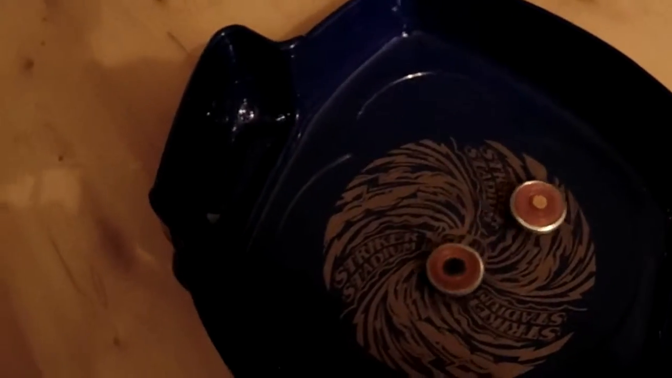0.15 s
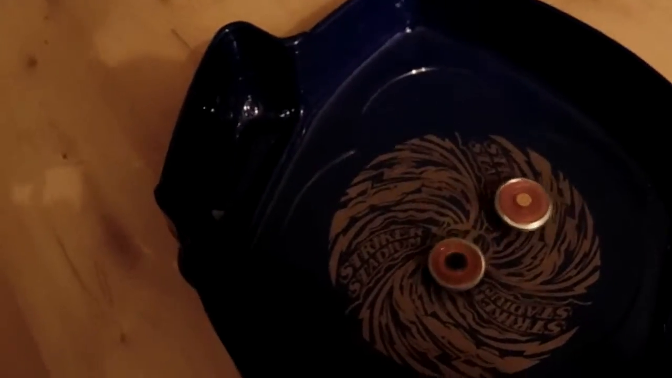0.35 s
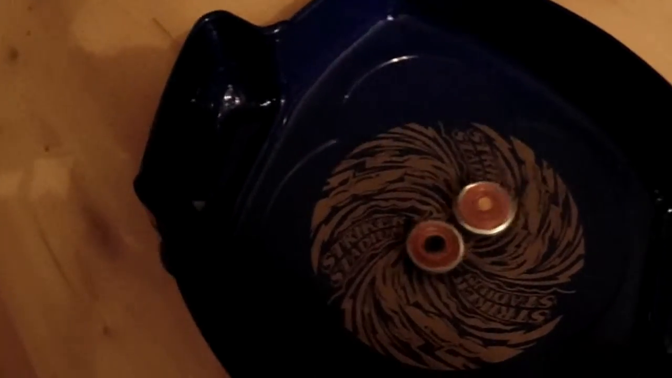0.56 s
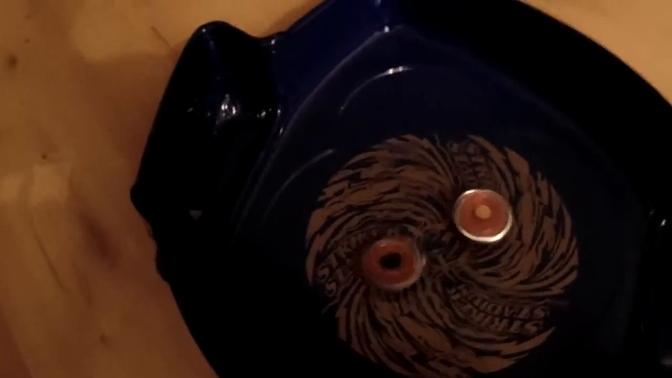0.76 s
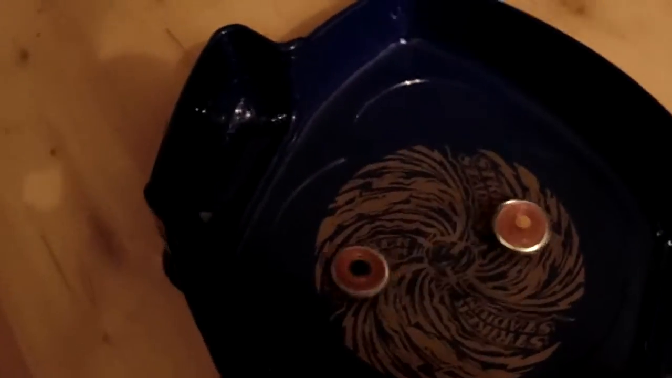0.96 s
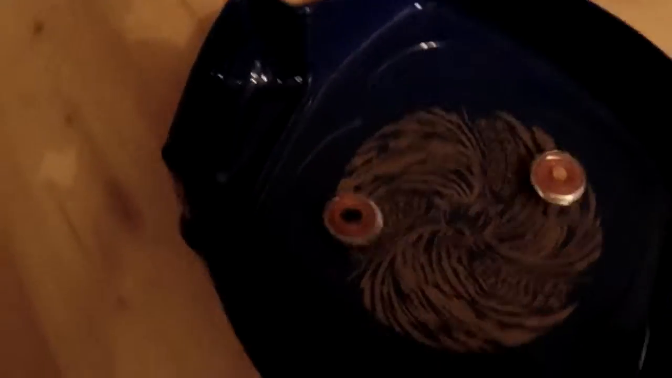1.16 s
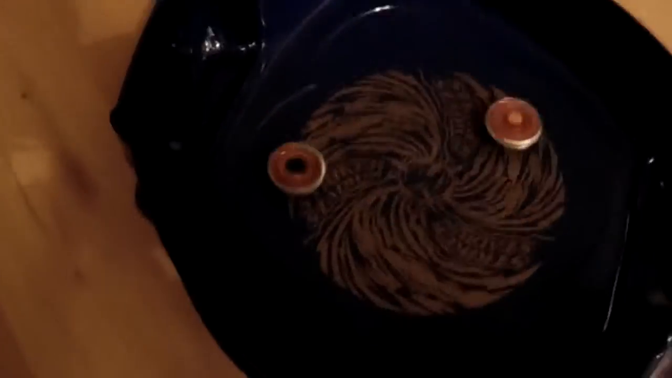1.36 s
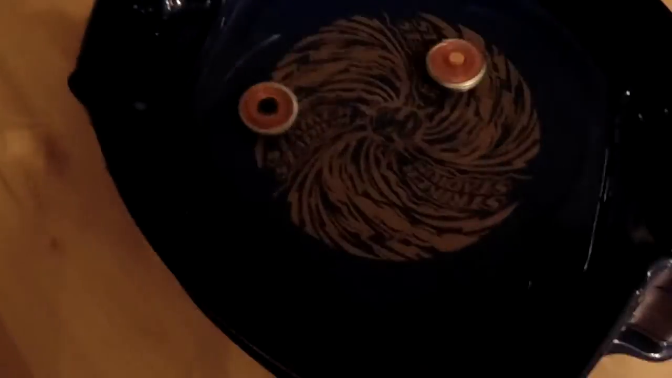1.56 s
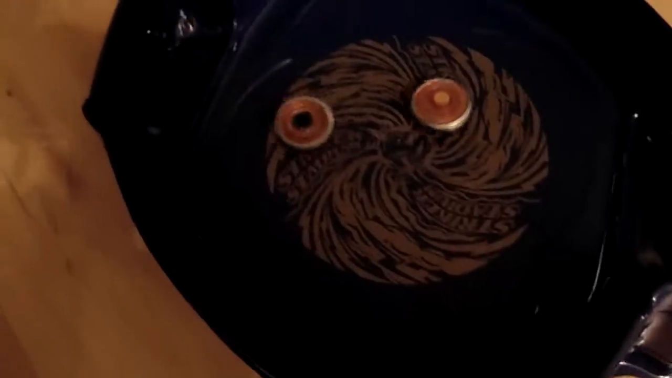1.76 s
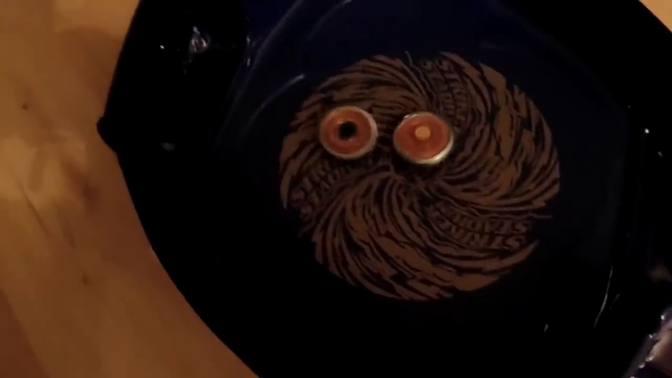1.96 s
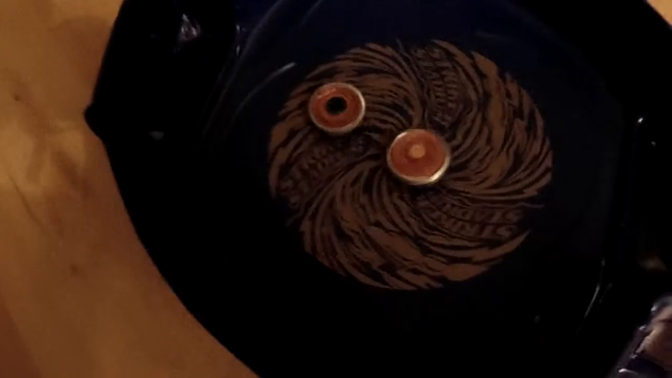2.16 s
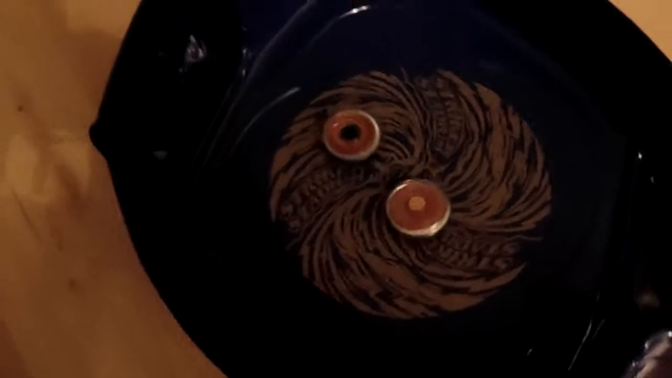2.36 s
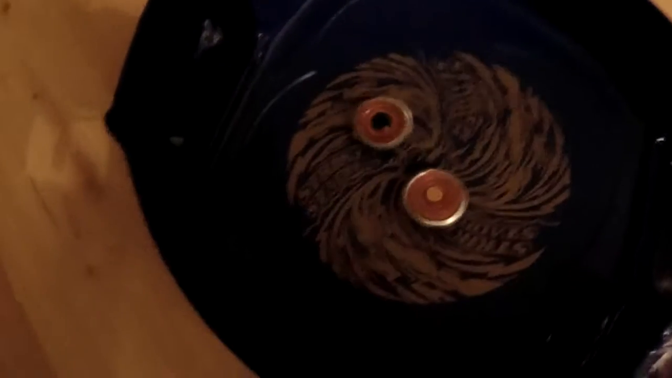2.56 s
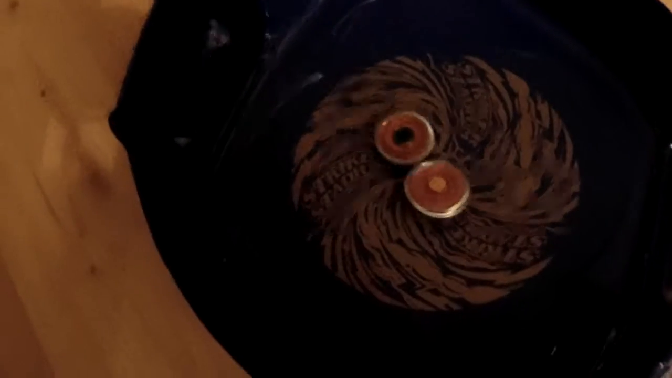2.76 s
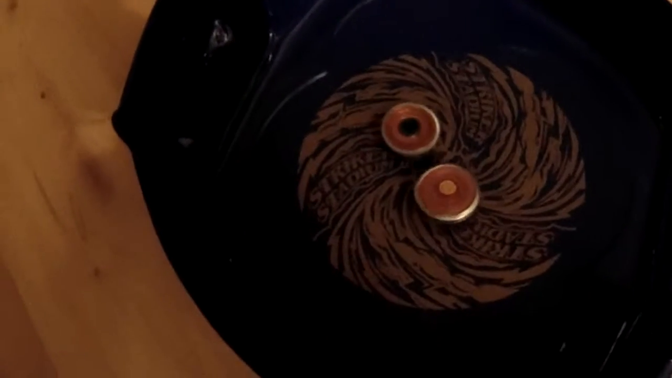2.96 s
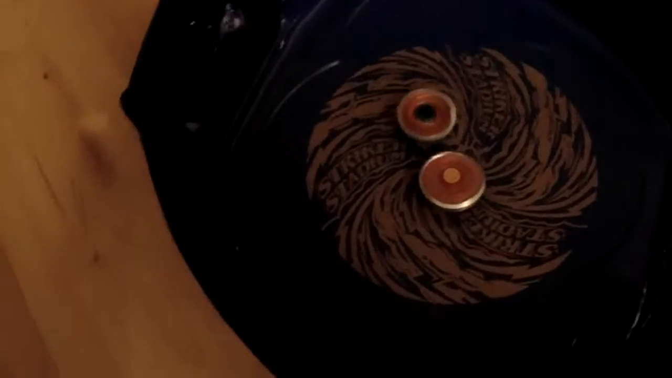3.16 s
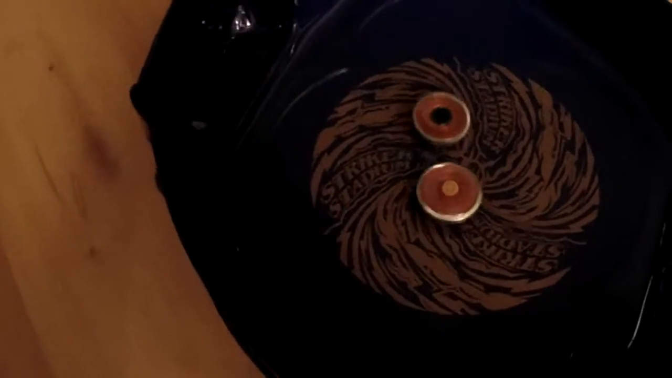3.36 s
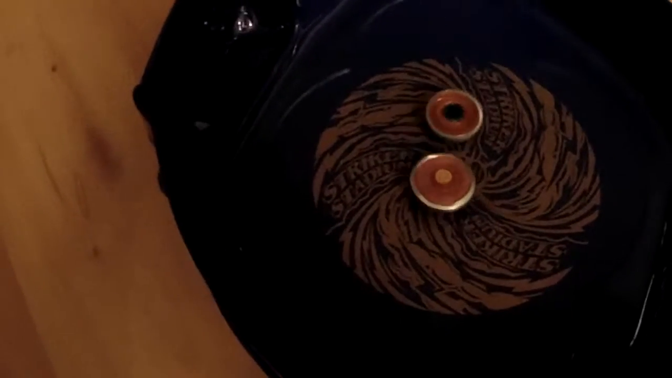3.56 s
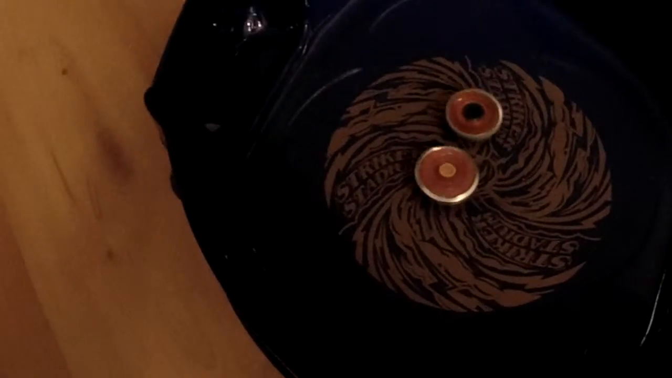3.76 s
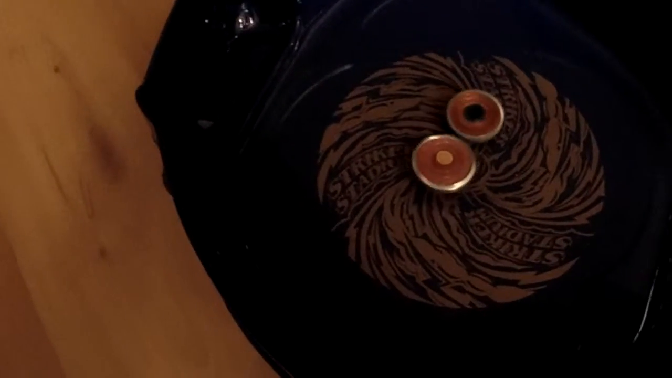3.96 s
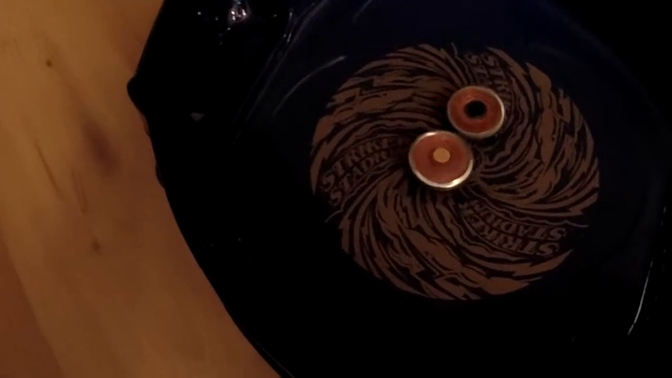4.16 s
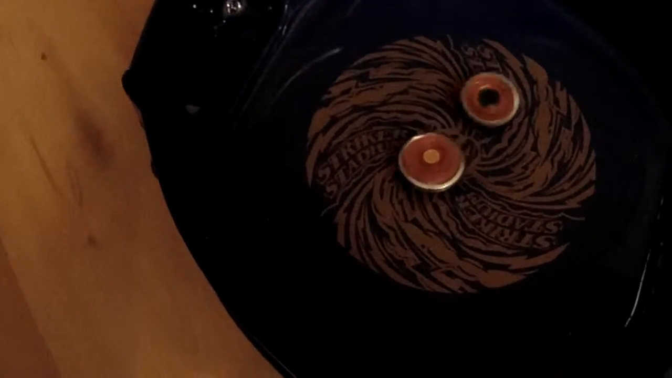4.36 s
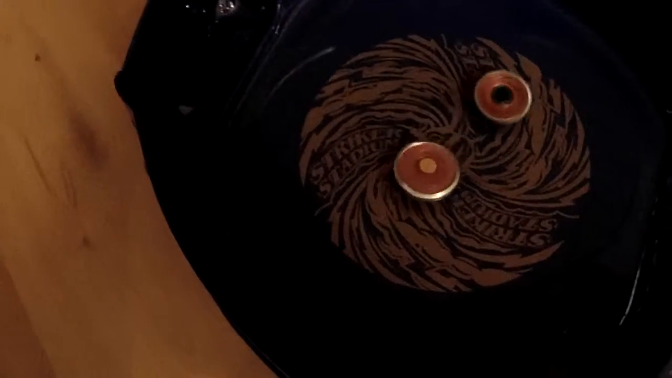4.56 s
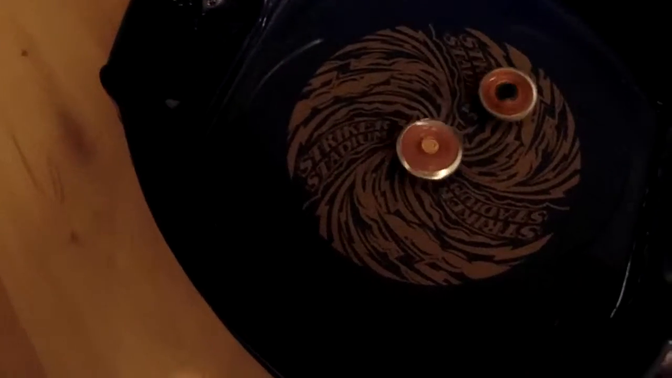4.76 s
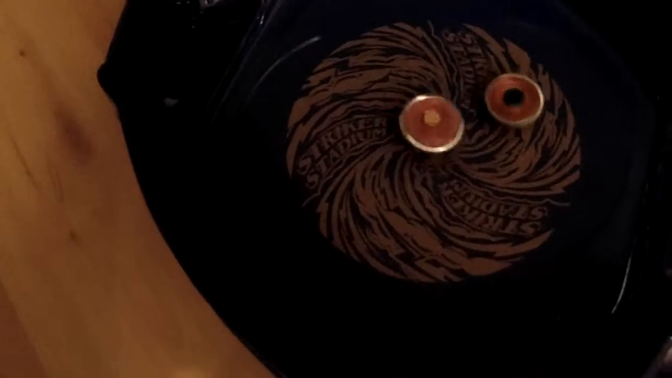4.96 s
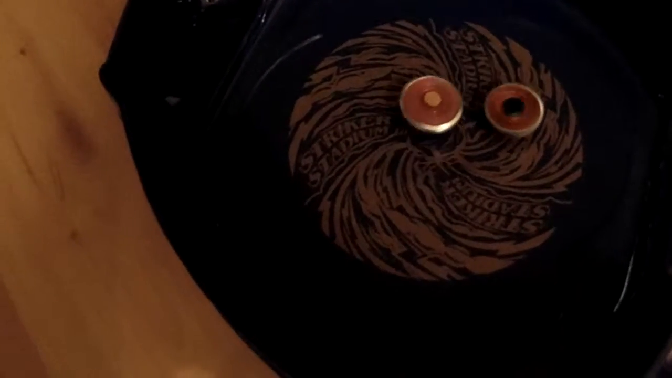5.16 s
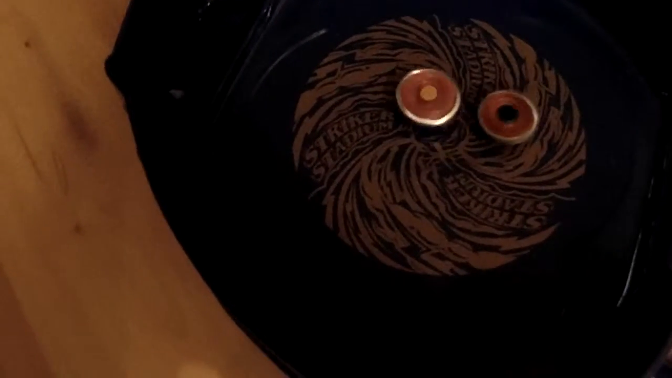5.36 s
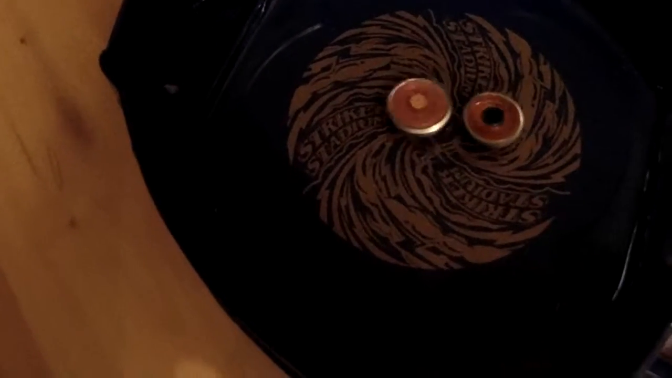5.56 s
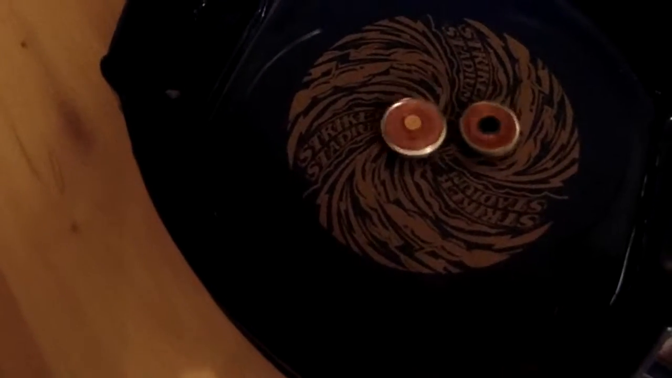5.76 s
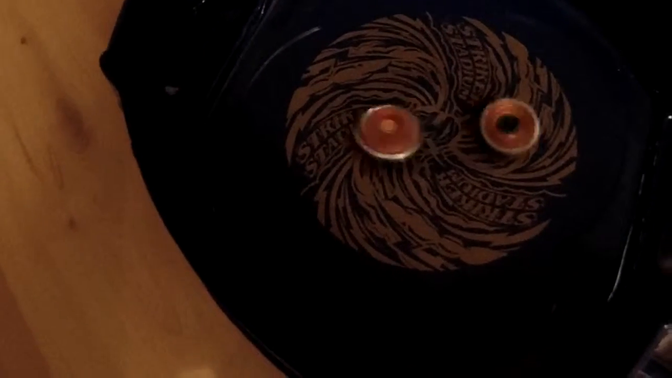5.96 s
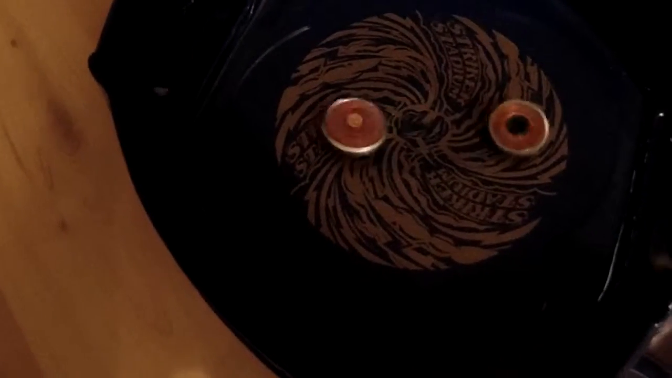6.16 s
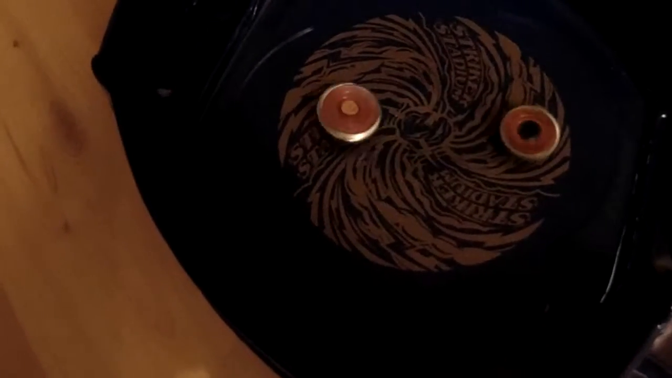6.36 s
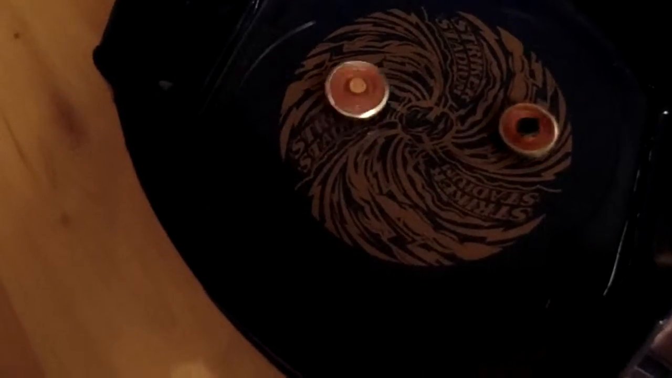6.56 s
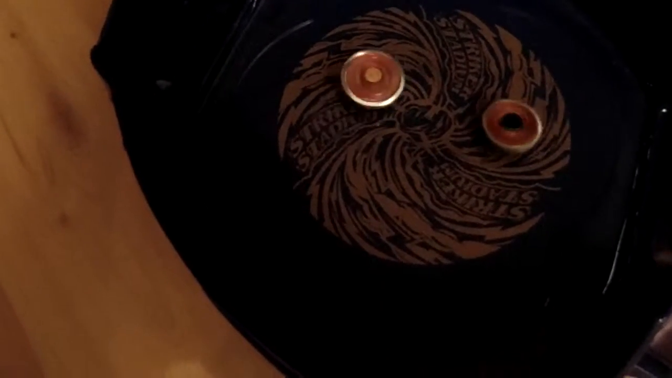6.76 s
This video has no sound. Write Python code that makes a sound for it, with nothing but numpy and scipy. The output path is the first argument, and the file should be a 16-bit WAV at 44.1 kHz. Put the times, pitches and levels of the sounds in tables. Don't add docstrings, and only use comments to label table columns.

```python
import sys
import numpy as np
from scipy import signal
from scipy.fft import rfft, irfft
from scipy.io import wavfile
from scipy.ndimage import uniform_filter1d

SR = 44100
rng = np.random.default_rng(int(sys.argv[2]) if len(sys.argv) > 2 else 0)


def amplitude_ratio(level_db):
    exponent = np.asarray(level_db, float) / 20
    return 10 ** exponent


def dump(signal):
    limited = np.clip(np.atleast_2d(signal).T, -1, 1)
    pcm = np.round(limited * 32767).astype(np.int16)
    wavfile.write(sys.argv[1], SR, pcm)


N = 300762


def evened(x):
    return x / np.sqrt(np.mean(x ** 2) + 1e-20)


def read(points, hz):
    f, value = np.transpose(points)
    return np.interp(np.log(hz + 1), np.log(f + 1), value)


def coloured(x, tone):
    gain = amplitude_ratio(read(tone, np.fft.rfftfreq(len(x), 1 / SR)))
    return irfft(rfft(x) * gain, len(x))


def along(table, column):
    rows = np.array(table)
    return np.interp(np.arange(N) / SR, rows[:, 0], rows[:, column])


def add(mix, start_s, sound):
    part = mix[round(start_s * SR):][:len(sound)]
    part += sound[:len(part)]


def high_pass(x, hz):
    return signal.sosfilt(signal.butter(2, hz, "high", fs=SR, output="sos"), x)


def grains(per_s, spread_db):
    strength = amplitude_ratio(spread_db * np.minimum(rng.exponential(1, N), 5))
    return strength * (rng.random(N) < per_s / SR) * rng.standard_normal(N)


def modes(table, t, detune):
    luck = rng.random((len(table), 2))
    out = 0
    for (hz, db, t60_s), (pitch, phase) in zip(table, luck):
        turns = hz * (1 + detune * (pitch - .5)) * t + phase
        out = out + amplitude_ratio(db - 60 * t / t60_s) * np.sin(2 * np.pi * turns)
    return out


# time in seconds, level in dB.
GRINDING_DB = [(0, -60.5), (.4, -55), (.7, -68), (.95, -51.5), (1.31, -54.5), (1.48, -57.5), (1.82, -55),
               (2.03, -51), (2.26, -68), (2.51, -96), (2.77, -54), (2.96, -67), (4.1, -73), (4.77, -58),
               (5.8, -70), (6.12, -58), (6.4, -61.5), (6.82, -62)]
# frequency in Hz, level in dB.
GRIND_TONE = [(60, -22.5), (150, 0.5), (280, 3), (450, -2), (650, 1), (900, -9.5), (1500, -20.5),
              (3000, -27.5), (6000, -42.5)]


def grind():
    contacts = coloured(grains(900, 3.0), GRIND_TONE)
    lumps = amplitude_ratio(0.71 * evened(uniform_filter1d(rng.standard_normal(N), 900)))
    return amplitude_ratio(along(GRINDING_DB, 1) - 6.0) * evened(contacts * lumps)


# start in seconds, level in dB, pitch in Hz.
HOPS = [
    (0.567, -55.5, 770),
    (0.636, -48.5, 736),
    (0.699, -52, 680),
    (0.733, -51, 725),
    (4.962, -55, 640),
    (4.997, -53, 590),
]


def hop(start_s, db, hz):
    t = np.arange(2000) / SR
    rise = 1 - np.exp(-t / 0.00041)
    return start_s, amplitude_ratio(db + 6.5) * modes([(hz, 0, .04)], t, 0.024) * rise


NODE_SHARE = .03


def struck(lobes, drive, contact_deg):
    out = []
    for (body, count), (angle_deg, db) in zip(lobes, drive):
        lobe = np.cos(np.radians(count * contact_deg[int(body)] - angle_deg) / 2) ** 2
        out.append(db + 20 * np.log10(NODE_SHARE + lobe))
    return out


def click(tone):
    cepstrum = irfft(np.log(amplitude_ratio(read(tone, np.fft.rfftfreq(1024, 1 / SR)))))
    cepstrum[1:512] *= 2
    cepstrum[513:] = 0
    pulse = irfft(np.exp(rfft(cepstrum)))
    return pulse / abs(pulse).max()


THROB_HZ = 29.2
# pitch in Hz, decay t60 in seconds, split of each close pair in Hz.
RING_HZ = [3370, 3922, 4148, 4398, 4865, 8060, 8292, 8553, 8845, 9450, 11030]
RING_T60_S = [.24, .14, .28, .25, .09, .14, .24, .18, .12, .09, .11]
RING_SPLIT_HZ = [5, 15, 14, 5, 15, 20, 8, 8, 25, 50, 55]
RING_LOBES = [(1, 3), (0, 5), (1, 4), (0, 4), (2, 3), (0, 5), (2, 1), (0, 4), (1, 3), (0, 4), (2, 5)]
# angle of the lobe pattern in degrees, level in dB when struck on a lobe.
RING_DRIVE = [(72, -25.5), (247, -29.5), (35.3, -22.5), (108, -19), (36, -32), (234, -32.5), (144, -33.5),
              (117.8, -35), (63, -21), (36, -20), (324, -22)]


def rings(contact_deg, t):
    ring_db = struck(RING_LOBES, RING_DRIVE, contact_deg)
    out = 0
    for hz, t60_s, split_hz, db in zip(RING_HZ, RING_T60_S, RING_SPLIT_HZ, ring_db):
        shift, phase = rng.random(2)
        lower_hz = hz - .5 * shift * split_hz
        upper_hz = hz + (1 - .5 * shift) * split_hz
        pair = [(lower_hz, db, t60_s), (upper_hz, db - 17.5, t60_s)]
        throb = 1 + .55 * np.cos(2 * np.pi * (THROB_HZ * t + phase))
        out = out + throb * modes(pair, t, 0)
    return out * (1 - np.exp(-t / 0.0015))


PART_HZ = [
    [3050, 3350],
    [3880, 4350, 4900],
    [5480, 5765],
    [8050, 8750, 9400, 10000],
    [1950, 2240, 2700],
    [10550, 11030],
    [12300, 12720, 13600],
]
# level in dB, decay t60 in seconds.
PARTS = [
    [(-4.5, 0.022), (-3.5, 0.03)],
    [(-3, 0.011), (1, .01), (-2, 0.007)],
    [(-2, 0.011), (-0.5, 0.022)],
    [(-6.5, 0.0089), (-4.5, 0.0053), (5, 0.0069), (-4, .008)],
    [(-12.5, 0.021), (-5, 0.029), (4, 0.013)],
    [(-10, .008), (-3.5, 0.017)],
    [(4.5, 0.0045), (6, 0.01), (-6.5, .008)],
]
PART_LOBES = [(2, 4), (2, 5), (1, 4), (1, 5), (0, 5), (2, 5), (0, 5)]
# angle of the lobe pattern in degrees, level in dB when struck on a lobe.
PART_DRIVE = [(161.9, -14.5), (153, -12.5), (0, -11), (319, -11.5), (81, -24), (261, -5.5), (80, -13)]


def damped_parts(contact_deg, t):
    table = []
    for pitches, group, drive_db in zip(PART_HZ, PARTS, struck(PART_LOBES, PART_DRIVE, contact_deg)):
        for hz, (db, t60_s) in zip(pitches, group):
            table.append((hz, db + drive_db, t60_s))
    table.sort()
    luck = rng.random((len(table), 2)) - .5
    out = np.zeros((2, len(t)))
    for k, ((hz, db, t60_s), (pitch, level)) in enumerate(zip(table, luck)):
        decay = amplitude_ratio(db + 1.3 * level - 60 * t / t60_s)
        out[k % 2] += (-1) ** k * decay * np.sin(2 * np.pi * hz * (1 + 0.0034 * pitch) * t)
    return out * (1 - np.exp(-(t / 0.00031) ** 2))


# frequency in Hz, decay t60 in seconds.
ROOM_T60 = [(300, 0.65), (1000, 0.35), (3000, 0.31), (6000, 0.32), (10000, 0.29), (14000, 0.25)]
# delay in seconds, level in dB.
ECHO_S = [.0053, .0072, .0126, .0165, .0190]
ECHO_DB = [-9.5, -19.5, -8.5, -15.5, -16.5]


def room(sources, tail_db=-5.5):
    slots = np.arange(300, SR // 2 - 16, 16)
    taps = np.zeros((len(sources), SR // 2))
    places = slots + rng.integers(0, 16, (len(sources), len(slots)))
    np.put_along_axis(taps, places, rng.choice([-1., 1.], places.shape), 1)
    hz, t, z = signal.stft(taps, SR, nperseg=256)
    decay = amplitude_ratio(-60 * t / read(ROOM_T60, hz)[:, None])
    tails = signal.istft(z * decay, SR, nperseg=256)[1]
    tails *= amplitude_ratio(tail_db) / np.linalg.norm(tails[0])
    tails[:, 0] += 1
    for delay_s, db in zip(ECHO_S, ECHO_DB):
        for tail in tails:
            tail[round((delay_s + .0005 * rng.random()) * SR)] += amplitude_ratio(db)
    return signal.fftconvolve(sources, tails, axes=1).sum(0)


# start in seconds, blow in dB, contact in degrees on first rim, second rim and loose weight ring.
CLASHES = [
    (0.662, -5.5, 64, 150, 307),
    (0.766, -1.5, 239, 76.2, 45.3),
    (2.0852, 2.5, 334.3, 333.4, 339),
    (2.834, -2, 153, 72.3, 148.4),
    (3.1636, -11.5, 241, 81.3, 225),
    (4.0098, -14, 99, 147.5, 338),
    (4.256, -14, 21, 187, 326),
    (4.327, -8, 317, 101.7, 145.5),
    (5.5877, -8.5, 318, 303, 17),
    (5.9406, 2.5, 144, 332.6, 187.4),
]
# frequency in Hz, level in dB.
CRACK_TONE = [(500, -28.5), (1500, -19), (2900, -2.5), (4700, 3), (6000, -7.5), (7000, -9.5), (9000, -5),
              (12800, -1), (15000, -3)]
# pitch in Hz, level in dB, decay t60 in seconds.
BOWL = [(239.6, -0.5, 0.054), (313, -0.5, 0.034), (437, 0.5, 0.048), (643, 2, 0.073), (870.5, -1.5, .02),
        (1141, -3, 0.039), (1400, -3, 0.062)]
TOOTH_LOBES = [(1, 5), (2, 4)]
# angle of the lobe pattern in degrees, level in dB when struck on a lobe.
TOOTH_DRIVE = [(117, 0.0), (153, -37)]


def clash(start_s, blow_db, *contact_deg):
    t = np.arange(SR // 2) / SR
    crack_db, thud_db = struck(TOOTH_LOBES, TOOTH_DRIVE, contact_deg)
    scrape = 0.48 * rng.standard_normal(len(t)) * np.exp(-t / 0.0031)
    scrape[round(.0004 * SR)] += 1
    crack = amplitude_ratio(blow_db + crack_db) * signal.fftconvolve(scrape, click(CRACK_TONE))[:len(t)]
    thud = amplitude_ratio(blow_db + thud_db) * modes(BOWL, t, 0.17) * (1 - np.exp(-t / 0.00016))
    thud = high_pass(thud, 200)
    ring = amplitude_ratio(blow_db) * rings(contact_deg, t)
    parts = amplitude_ratio(blow_db + 1.0) * damped_parts(contact_deg, t)
    heard = room(np.array([crack + thud + 0.88 * ring, *parts]))
    add(heard, 0, 0.45 * ring)
    return start_s, heard


# start in seconds, level in dB, brightness in dB.
TICKS = [(0.958, -62, 16), (1.437, -42, -28), (1.482, -64, -26), (2.489, -41.5, -10), (2.499, -54, -8),
         (2.517, -39.5, -4), (2.539, -23, -17), (2.543, -16, -5), (2.5521, -29, -24), (2.558, -35, -30),
         (2.568, -34, -28), (3.868, -49, -18), (4.968, -49.5, 0), (4.976, -44, -14), (4.981, -44, -17)]
# pitch in Hz, level in dB, decay t60 in seconds.
SHELL = [(500, -14, .015), (1150, -4, .018), (1400, -3, .016), (1800, 0, .017), (2100, -4, .012),
         (2680, -1, .013), (4400, -14, .007)]


def tick(start_s, db, bright_db):
    t = np.arange(3000) / SR
    puff = rng.standard_normal(len(t)) * (t / .0006) * np.exp(1 - t / .0006)
    shell = high_pass(signal.fftconvolve(modes(SHELL, t, 0.017), puff)[:len(t)], 350)
    dry_click = amplitude_ratio(bright_db - 7.0) * np.diff(puff, 2, prepend=[0, 0])
    return start_s, amplitude_ratio(db) * (shell / abs(shell).max() + dry_click)


def brush():
    start_s, rise_s, hold_s, fall_s = 1.2, 0.066, 0.77, .15
    corners_s = np.cumsum([start_s, rise_s, hold_s, fall_s])
    shape = np.interp(np.arange(N) / SR, corners_s, [0, 1, 1, 0])
    tone = [(100, -30), (2500, -3), (14000, 0)]  # (Hz, dB)
    return amplitude_ratio(-63) * shape * coloured(rng.standard_normal(N), tone)


# time in seconds, level in dB.
RUSTLE_DB = [(1.28, -70.5), (1.288, -70), (1.382, -54), (1.442, -49.5), (1.602, -59), (1.624, -73),
             (1.7, -81)]
# frequency in Hz, level in dB.
RUSTLE_TONE = [(300, -6), (800, 1), (1300, 0.5), (2200, -4), (3200, -0.5), (4500, -8.5), (6500, -19),
               (10000, -24)]


def rustle():
    rub = evened(coloured(grains(2500, 0.95), RUSTLE_TONE))
    t = np.arange(N) / SR
    fade_in = np.clip((t - RUSTLE_DB[0][0]) / 0.047, 0, 1)
    fade_out = np.clip((RUSTLE_DB[-1][0] - t) / 0.049, 0, 1)
    return amplitude_ratio(along(RUSTLE_DB, 1) + 0.5) * fade_in * fade_out * rub


def scene():
    mix = grind() + brush() + rustle()
    for row in HOPS:
        add(mix, *hop(*row))
    for row in CLASHES:
        add(mix, *clash(*row))
    for row in TICKS:
        add(mix, *tick(*row))
    return mix[None]


def gain_db():
    from_db, knee_db = -7, 2
    depth_base_db, more_per_db = -1, 0.3565
    fall_s, hold_s, back_s = 0.21, 0.41, 0.52
    t = np.arange(N) / SR
    out = np.zeros(N)
    for start_s, blow_db, *_ in CLASHES:
        shape = np.interp(t - start_s, np.cumsum([0, fall_s, hold_s, back_s]), [0, 1, 1, 0])
        over_db = blow_db - from_db
        depth_db = (depth_base_db - more_per_db * over_db) * np.clip(over_db / knee_db, 0, 1)
        out = np.minimum(out, depth_db * shape)
    return out


def low_pass(x):
    return signal.sosfilt(signal.butter(12, 14940, fs=SR, output="sos"), x)


# frequency in Hz, level in dB.
HISS_TONE = [(20, 17.5), (60, 14), (150, 11), (400, 10), (1000, 5), (2500, -0.5), (6000, -4), (10000, -5),
             (14000, -5.5)]


def record(dry):
    hiss_db, clip, edge_hz = -57.5, .92, 14190
    hiss = amplitude_ratio(hiss_db) * evened(coloured(rng.standard_normal(N), HISS_TONE))
    overloaded = np.clip((dry + hiss) * amplitude_ratio(gain_db()), -clip, clip)
    edge = signal.firwin(301, edge_hz, window=("kaiser", 8), fs=SR)
    mix = signal.oaconvolve(overloaded, edge[None], "same")
    return low_pass(mix)


dry = scene()
out = record(dry)
dump(out)
```